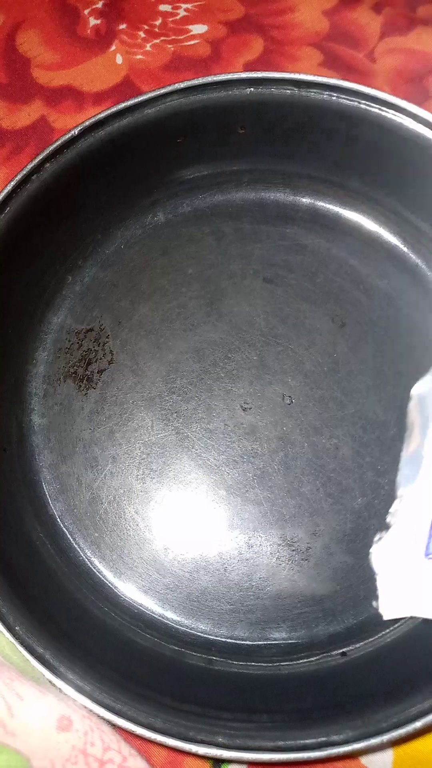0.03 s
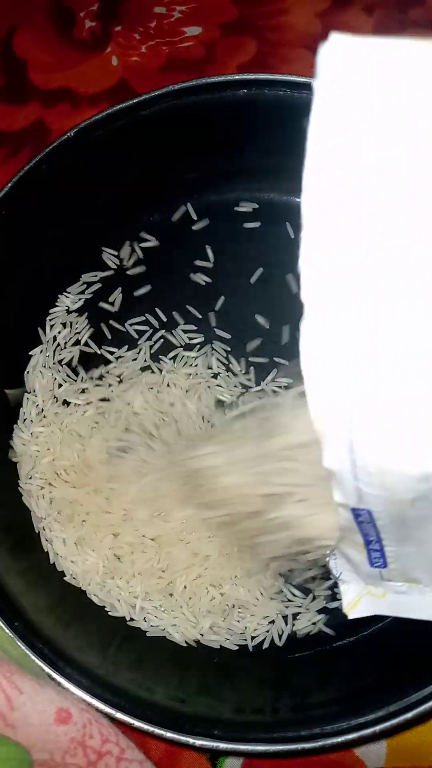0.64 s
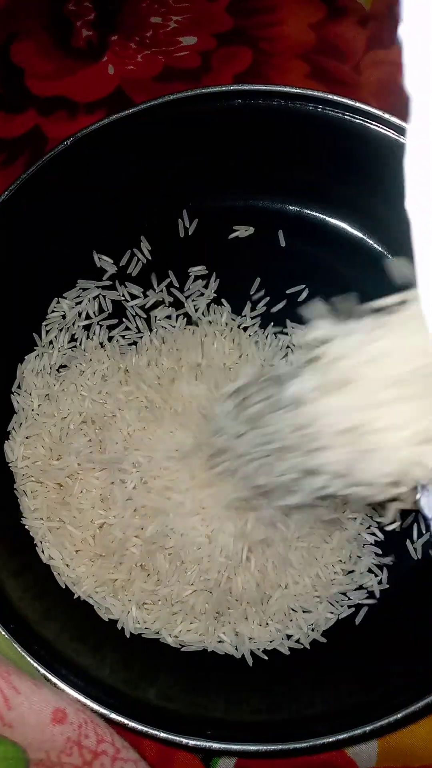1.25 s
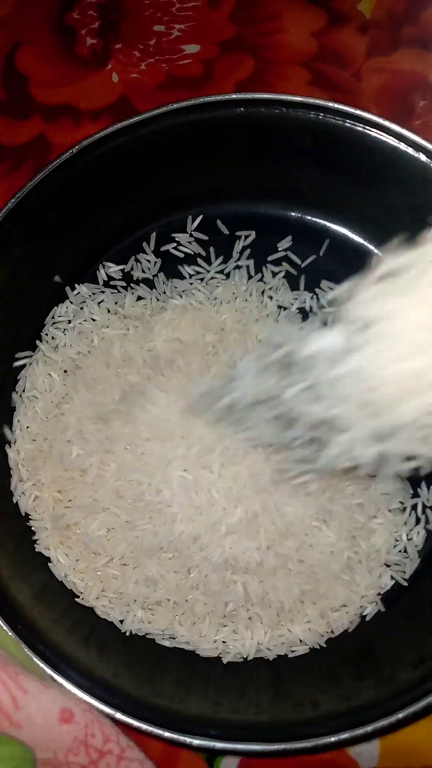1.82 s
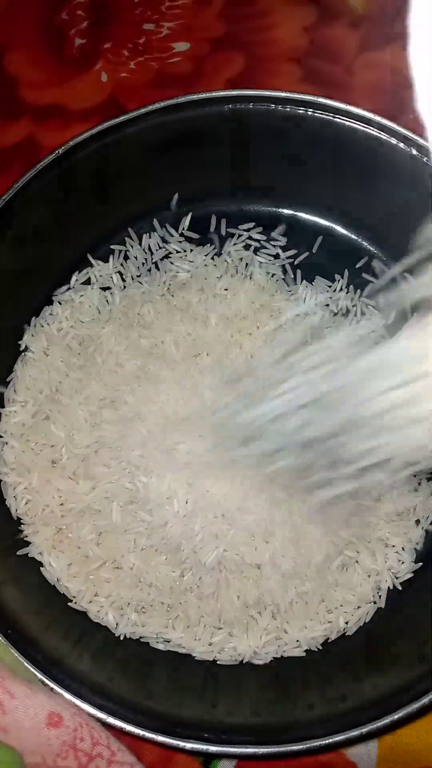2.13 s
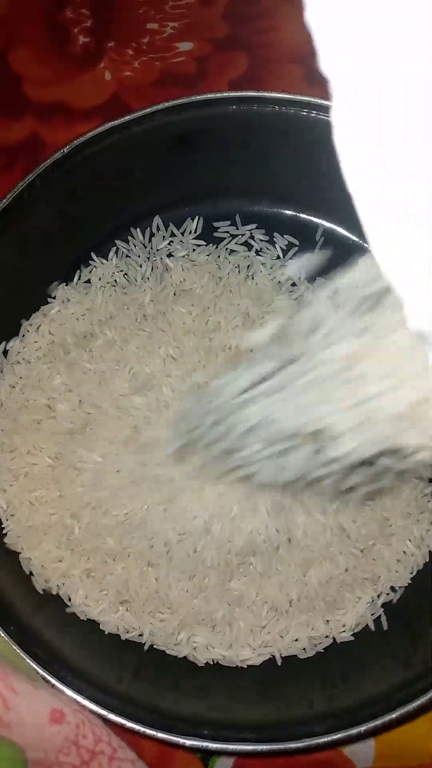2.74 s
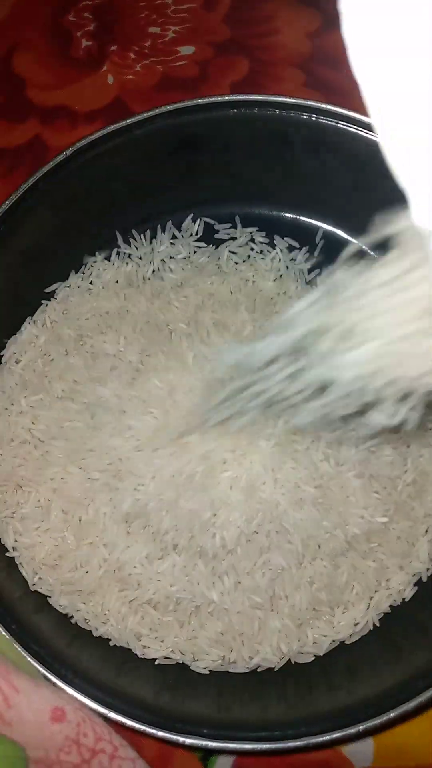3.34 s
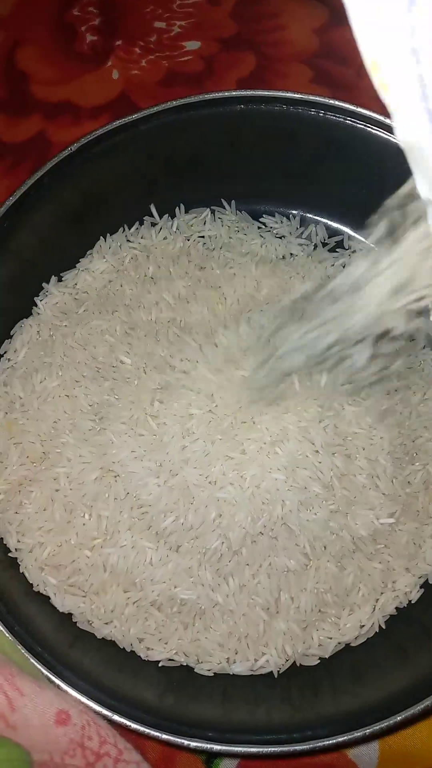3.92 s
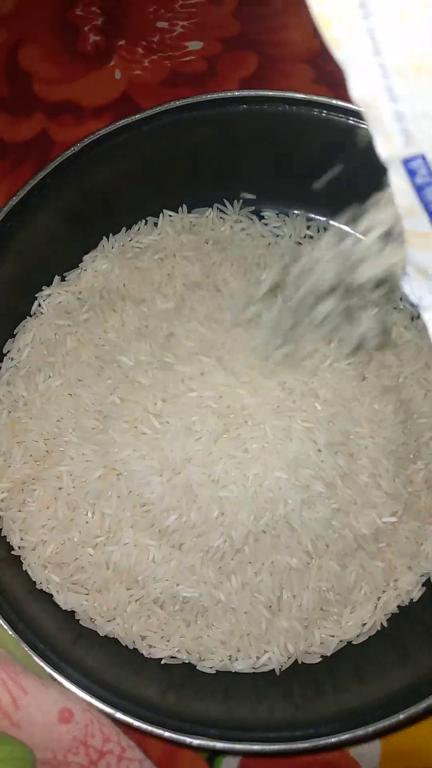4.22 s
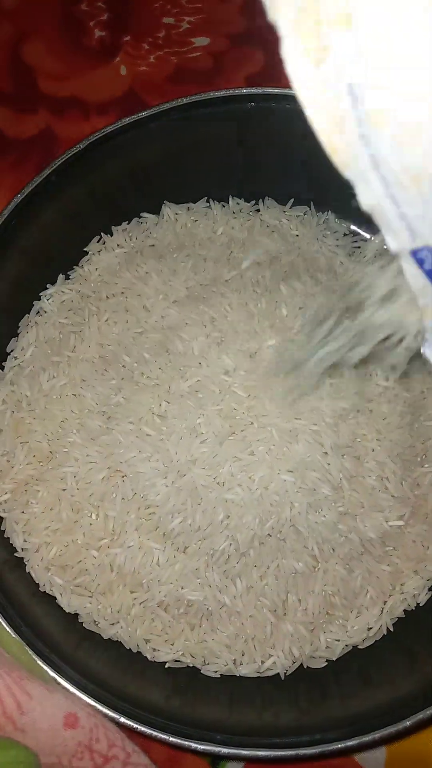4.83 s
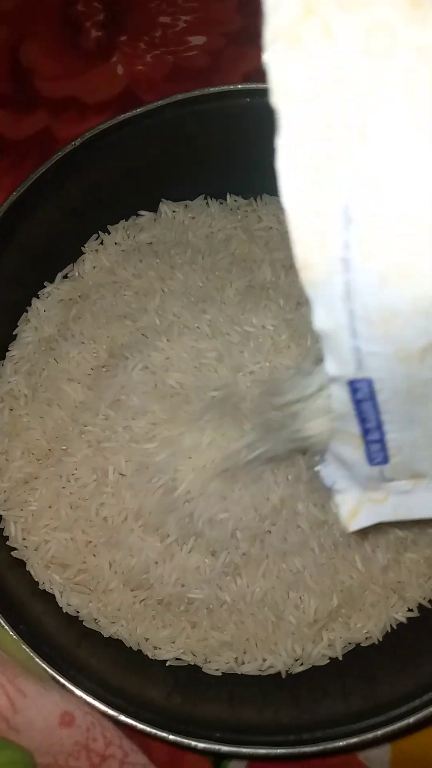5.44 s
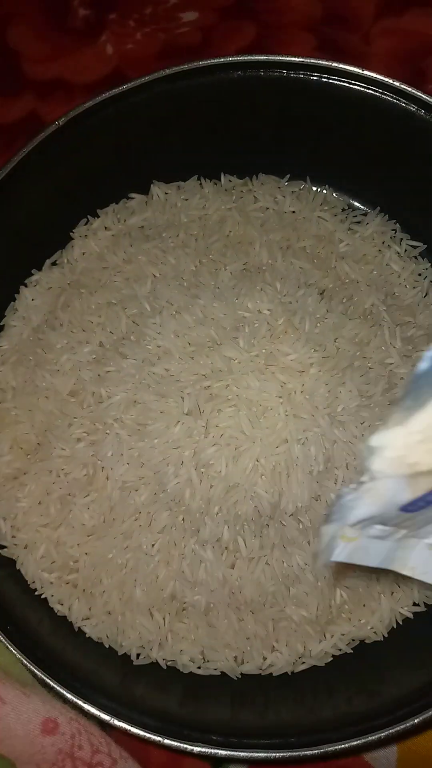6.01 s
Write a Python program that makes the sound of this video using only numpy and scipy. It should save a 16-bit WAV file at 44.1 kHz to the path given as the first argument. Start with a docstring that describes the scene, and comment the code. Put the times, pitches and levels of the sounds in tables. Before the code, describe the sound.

Close by, rice grains patter on bare metal, then hiss onto a growing heap while a plastic packet pops and crackles.

```python
"""Dry rice pours from a plastic packet into a metal pan, heard from close by.
The first grains ring the bare bottom; then the stream hisses on its own heap, grain jostling grain,
while the pan drums and stray grains strike its wall. The packet's film buckles and crinkles as it
empties, and crackles once more as it is tipped back. A low hum fills the small room."""
import sys
import numpy as np
from scipy import signal
from scipy.fft import rfft, irfft
from scipy.io import wavfile

SR = 44100
rng = np.random.default_rng(int(sys.argv[2]) if len(sys.argv) > 2 else 0)


def pcm_store(signal):
    """Save signal as 16-bit PCM."""
    levels = np.round(np.clip(np.atleast_2d(signal), -1, 1) * 32767)
    wavfile.write(sys.argv[1], SR, levels.astype(np.int16).T)


N = 272097
TIME = np.arange(N) / SR
LANDING_S, STOP_S = 0.3, 5.92   # the stream reaches the pan; the last grains leave the packet


def from_db(db):
    """Decibels to gain."""
    return 10 ** (np.asarray(db) / 20)


def rms_one(x):
    """Scale to rms 1."""
    return x / np.sqrt(np.mean(x ** 2) + 1e-20)


def since(s):
    """Seconds since a moment; 0 before it."""
    return np.maximum(TIME - s, 0)


def gain_curve(rows):
    """Rows of (s, dB) to a gain per sample."""
    s, db = np.transpose(rows)
    return from_db(np.interp(TIME, s, db))


def swells(rows, half_s):
    """Rows of (s, dB) to a gain with a smooth bump or dip at each moment."""
    return from_db(sum(db * np.exp(-((TIME - s) / half_s) ** 2) for s, db in rows))


def drift(rate_hz):
    """Slow random wander, rms 1."""
    r = np.exp(-2 * np.pi * rate_hz / SR)
    return rms_one(signal.lfilter([1], [1, -2 * r, r * r], rng.standard_normal(N + SR))[SR:])


def resonator(hz, width_hz):
    """Coefficients of a two-pole resonance, peak gain 1."""
    r = np.exp(-np.pi * width_hz / SR)
    return np.array([1, 0, -1]) * (1 - r * r) / 2, [1, -2 * r * np.cos(2 * np.pi * hz / SR), r * r]


def resonate(x, hz, width_hz):
    """Pass through one resonance."""
    return signal.lfilter(*resonator(hz, width_hz), x + 1e-18)


def ring_modes(x, modes):
    """Sum of parallel resonances."""
    return sum(from_db(db) * resonate(x, hz, width_hz) for hz, width_hz, db in modes)


def colour(x, points, size=4096):
    """Minimum-phase filter through (Hz, dB) points."""
    hz, db = np.transpose(points)
    bins = np.maximum(np.arange(size // 2 + 1) * SR / size, 1)
    cepstrum = irfft(np.log(from_db(np.interp(np.log(bins), np.log(hz), db))))
    cepstrum[1:size // 2] *= 2
    cepstrum[size // 2 + 1:] = 0
    return signal.fftconvolve(x, irfft(np.exp(rfft(cepstrum))))[:len(x)]


def burst(t60_s, size=2048):
    """Decaying noise burst, energy 1."""
    x = rng.standard_normal(size) * from_db(-60 * TIME[:size] / t60_s)
    return x / np.linalg.norm(x)


def impacts(per_s, spread_db):
    """Impulses of random time, size and sign, rms 1."""
    sizes = from_db(spread_db * np.minimum(rng.exponential(1, N), 3)) * rng.choice([-1, 1], N)
    return rms_one(sizes * (rng.random(N) < per_s / SR))


def add(out, s, sound, peak_db):
    """Mix in a sound at a given time and peak."""
    part = out[round(s * SR):][:len(sound)]
    part += from_db(peak_db) * sound[:len(part)] / np.max(np.abs(sound))


# Background spectrum. Each row: frequency in Hz, gain in dB.
ROOM_COLOUR = [(25, -34), (55, -4.5), (85, -1.5), (120, -6), (180, -1.5), (330, -2), (460, -28.5),
               (1500, -25), (8000, -37)]
# Each row: multiple of the hum's pitch, level in dB re the fundamental.
HUM_HARMONICS = [(1, 0), (2, -6.5), (3, -8), (4, -4.5)]
# Wavering of hum and background. Each row: time in seconds, gain in dB.
ROOM_SWELL = [(.08, -11), (.8, 2.5), (3.7, 4), (4.3, -2.5), (4.7, 3), (6.17, 3)]

def room_tone(hum_hz=83.3, width_hz=14.6, hum_db=-59, background_db=-61):
    """A wavering low hum over a dull background."""
    out = from_db(background_db) * rms_one(colour(rng.standard_normal(N), ROOM_COLOUR))
    for k, db in HUM_HARMONICS:
        line = resonate(rng.standard_normal(N), k * hum_hz, k * width_hz)
        out += from_db(hum_db + db) * rms_one(resonate(line, k * hum_hz, k * width_hz))
    return out * gain_curve(ROOM_SWELL)


# Strength of the stream. Each row: time in seconds, relative level in dB.
FLOW = [(0.09, -53), (0.13, -41), (0.25, -31.5), (0.9, -31.5), (1.38, -31.5), (1.54, -35.0), (1.8, -32.5),
        (2.6, -33.5), (3.0, -29), (3.45, -32.5), (3.57, -33), (3.75, -32.5), (4.25, -36.0), (5.05, -30.5),
        (5.33, -30.5), (5.55, -37.5), (5.7, -54.5), (6.17, -57.5)]
# Clumps dropping onto the heap. Each row: time in seconds, boost in dB.
CLUMPS = [(2.317, 0.5), (2.372, 3), (2.42, 6.5), (2.665, 0), (2.725, 1), (3.45, 4.5), (3.7, 1), (4.7, 3.5)]

def flow():
    """The flow follows the packet's tilt, with one brief dip and a few clumps."""
    dip = swells([(1.9, -4)], half_s=0.016)
    return gain_curve(FLOW) * dip * swells(CLUMPS, half_s=0.016)


def depth(shallow=0.23, grows_from_s=2.87, growth_per_s=0.57):
    """Rice depth under the moving grains, 0-1: first the full packet, then the growing heap."""
    heap = np.clip(shallow + growth_per_s * since(grows_from_s), 0, 1)
    return np.where(TIME < LANDING_S, 1, heap)


def rice_hiss(layers=8, trickle_share=0.02, gain_db=0.39, handover_s=0.062, emptied_s=5.55):
    """Grains jostle grains: in the packet, then on the heap, then in the packet as the stream thins."""
    strength = flow()
    per_s = 1000 * (trickle_share + (strength / strength.max()) ** 1.2)
    jostle = sum(signal.fftconvolve(impacts(per_s, spread_db=2.5), burst(t60_s=0.0051))[:N]
                 for _ in range(layers))
    flicker = from_db(1.08 * drift(60) + 0.5 * drift(16))
    jostle = jostle * flicker / np.sqrt(per_s)
    landed = np.minimum(since(LANDING_S) / handover_s, 1) - np.minimum(since(emptied_s) / handover_s, 1)
    return from_db(gain_db) * strength * (landed * on_heap(jostle) + (1 - landed) * in_packet(jostle))


# Air resonances of the open packet. Each row: frequency in Hz, width in Hz, gain in dB.
PACKET_MODES = [(1500, 460, 6.5), (2320, 200, 7), (2870, 560, 7.5), (3400, 180, 0), (3870, 360, 2.5),
                (4670, 270, 1), (5480, 160, -20), (6000, 210, -8)]
# Spectrum of rice sliding in the packet. Each row: frequency in Hz, gain in dB.
PACKET_COLOUR = [(150, -29), (450, -12), (660, -6), (900, 1), (1900, -3), (4000, -3), (5100, 1.5),
                 (6600, 10), (7900, -3), (9600, -11), (11600, -15), (16000, -20)]

def in_packet(jostle):
    """Sliding rice rings the air in the packet."""
    return rms_one(colour(jostle + ring_modes(jostle, PACKET_MODES), PACKET_COLOUR))


# Buckles of the packet wall. Each row: start in seconds, panel pitch in Hz, its peak in dB,
# overtone in Hz, its peak in dB, thump peak in dB, crack peak in dB.
POPS = [(0.169, 1140, -31, 1600, -36, -55, -39), (0.265, 1460, -25, 2880, -23, -31.5, -23),
        (0.8562, 1600, -20.5, 2180, -26, -43, -22), (1.003, 1000, -18.5, 1670, -21, -27, -13),
        (1.009, 1060, -23, 1590, -22, -31, -34), (1.1634, 1360, -16.5, 2130, -18, -28.5, -22),
        (1.248, 1090, -27, 1500, -33, -32, -35), (1.3326, 1160, -16.5, 1620, -13, -25.5, -18),
        (1.383, 1100, -21.5, 1690, -21, -20, -14.5), (1.5962, 1060, -12.5, 2260, -14.5, -25, -10.5),
        (1.8927, 1670, -24, 4120, -16, -26, -20), (1.912, 1450, -15, 2180, -18, -35.5, -14.5),
        (2.2534, 1350, -16, 2200, -21, -46, -12.5), (2.362, 1690, -28, 2500, -20, -54, -20),
        (2.410, 1190, -33, 2300, -27, -34, -18), (2.678, 1540, -20, 2300, -22, -38, -22),
        (2.874, 1140, -22, 1650, -29, -32, -35), (3.940, 1000, -32, 1800, -30, -53, -28),
        (5.050, 1230, -24.5, 2400, -24, -49, -26), (5.414, 1100, -35, 1650, -36, -35, -34.5),
        (5.538, 1050, -27, 1500, -42, -38, -39), (5.578, 1550, -27, 1990, -41, -44.5, -18),
        (5.607, 580, -29.5, 1190, -43.5, -37, -29), (5.807, 840, -26, 1560, -26.5, -40, -43),
        (5.838, 790, -33, 1470, -33, -45, -44), (5.9371, 840, -39, 1670, -38, -52, -10),
        (5.991, 1200, -39, 2300, -36, -55, -40), (6.001, 1000, -37, 1800, -35, -52, -41),
        (6.015, 1090, -32, 2000, -30, -43, -38)]
# Spectrum of a cracking crease. Each row: frequency in Hz, gain in dB.
CREASE_COLOUR = [(300, -13.5), (1500, -4.5), (3000, -15), (5000, -3.5), (6650, 2), (7500, -2), (9000, -13),
                 (12000, -23), (16000, -25)]

def packet_pops(panel_t60_s=0.01, overtone_t60_s=0.008, thump_t60_s=0.02, thump_centre_hz=351):
    """A film panel snaps through: two short rings, a thump of the filled packet, a crack at the crease."""
    out, t = np.zeros(N), TIME[:2048]
    for s, panel_hz, panel_db, overtone_hz, overtone_db, thump_db, crack_db in POPS:
        rings = (panel_hz, panel_t60_s, panel_db), (overtone_hz, overtone_t60_s, overtone_db)
        for hz, t60_s, peak_db in rings:
            snap = rms_one(np.sin(2 * np.pi * hz * t) * from_db(-60 * t / t60_s))
            flutter = rms_one(resonate(burst(t60_s), hz, hz * 0.8))
            add(out, s, resonate(snap + 0.69 * flutter, hz, hz * 1.2), peak_db)
        thump_hz = thump_centre_hz * (1 + 0.17 * rng.uniform(-0.81, 1))
        attack = 1 - np.exp(-t / 0.00033)   # inertia of the heavy packet
        thump = np.sin(2 * np.pi * thump_hz * t) * attack * from_db(-60 * t / thump_t60_s)
        add(out, s, resonate(thump, hz=240, width_hz=460), thump_db)
        add(out, s, colour(burst(t60_s=0.0063), CREASE_COLOUR), crack_db)
    return out


# Each row: start in seconds, peak in dB, lower band edge in Hz.
CRINKLES = [(0.197, -26, 3500), (0.2326, -17, 1500), (1.7908, -20, 4000), (1.833, -15, 3000),
            (1.9839, -15, 1520), (2.01, -18, 3000), (2.0916, -19, 4000), (2.16, -15, 2500),
            (2.2413, -18, 4000), (2.6598, -22, 1800), (2.748, -21, 3000), (3.4021, -16, 3500),
            (3.6385, -13.5, 3000), (3.686, -23, 2500), (3.7297, -16, 3000), (3.8197, -27, 2200),
            (4.0572, -21, 3520), (4.106, -18.5, 4000), (4.1265, -20, 3500), (4.1885, -20, 3000),
            (4.4589, -16, 2200), (4.5396, -15, 2000), (4.6198, -18, 1800), (4.942, -17, 2200)]

def packet_rustle(top_hz=7600, tip_back_s=5.94, run_db=-41, hold_s=0.061, fade_db_per_s=169.5):
    """Creases give way singly while pouring, and in a dense run as the packet is tipped back."""
    out = np.zeros(N)
    for s, peak_db, low_hz in CRINKLES:
        band = signal.butter(3, [low_hz, top_hz], "band", fs=SR, output="sos")
        add(out, s, signal.sosfilt(band, burst(t60_s=0.0053)), peak_db)
    creases = colour(impacts(per_s=3000, spread_db=-2.5), CREASE_COLOUR)
    run = (TIME > tip_back_s) * from_db(run_db - fade_db_per_s * since(tip_back_s + hold_s))
    return out + run * rms_one(creases)


# Each row: centre in seconds, level in dB, pitch in Hz, half length in seconds.
RUMBLES = [(0.275, -40.5, 180, 0.027), (1.008, -34.5, 327, 0.023), (1.397, -42.5, 267, 0.069),
           (4.895, -54, 184, 0.054), (5.124, -53.5, 494, 0.24), (5.447, -43, 175, 0.032),
           (5.953, -47, 240, 0.023)]

def rumbles():
    """Short dull low rumbles, and one longer faint low-mid swell near 5.1 s."""
    out = np.zeros(N)
    for s, db, hz, half_s in RUMBLES:
        rumble = resonate(resonate(rng.standard_normal(N), hz, hz * 0.83), hz, hz * 0.83)
        out += from_db(db) * np.exp(-((TIME - s) / half_s) ** 2) * rms_one(rumble)
    return out


# Metal modes of the pan's bottom and wall. Each row: frequency in Hz, width in Hz, gain in dB.
BOTTOM_MODES = [(2500, 260, -10), (3930, 55, -4), (4870, 55, -4), (5280, 160, -8), (5870, 50, 1),
                (6320, 160, -4), (6960, 55, 4), (7520, 70, -10), (7770, 80, -5), (8110, 60, -12),
                (8550, 90, -10), (8820, 60, -10), (9040, 45, -1), (9400, 100, -15), (9840, 70, -10),
                (10100, 70, -10), (10610, 80, -5), (11970, 170, -8), (12590, 60, -8), (13030, 130, -7),
                (13470, 80, -8), (14130, 60, -10), (14580, 70, -11), (14900, 140, -13), (15100, 130, -9),
                (15550, 130, -7)]
WALL_MODES = [(7010, 110, 6.5), (11140, 140, -12), (11700, 120, -3.5), (12900, 80, 1), (12600, 50, -13),
              (13000, 97, -3), (13240, 99, 1), (13900, 70, -7), (14450, 90, -26), (14650, 126, 2),
              (15600, 170, -15), (15350, 200, -7), (15900, 210, 7), (15800, 250, -20)]
# Single grains, first on the bottom, last on the wall. Each row: start in seconds, peak in dB.
FIRST_GRAINS = [(0.2835, -24), (0.2868, -22), (0.2945, -32), (0.3005, -36), (0.3115, -30), (0.3155, -20)]
LAST_GRAINS = [(5.653, -30.5), (5.6624, -27), (5.6694, -36), (5.743, -30), (5.7733, -33.5), (5.7843, -28),
               (5.8246, -29.5), (5.8405, -31), (5.8554, -36), (6.0422, -39)]

def lone_grains():
    """A lone grain skitters briefly on the metal and rings it."""
    out = np.zeros(N)
    for grains, modes in (FIRST_GRAINS, BOTTOM_MODES), (LAST_GRAINS, WALL_MODES):
        for s, peak_db in grains:
            skitter = burst(t60_s=0.027)
            contact = from_db(-5) * resonate(skitter, hz=8100, width_hz=7000)
            add(out, s, ring_modes(skitter, modes) + contact, peak_db)
    return out


# Air resonances of the pan. Each row: shallow frequency in Hz, deep frequency in Hz, width in Hz,
# shallow gain in dB, deep gain in dB.
PAN_AIR_MODES = [(1076, 1140, 213, -3, 3), (1410, 1450, 350, 2.5, 0.5), (1600, 1800, 164, 3.5, -8),
                 (2230, 2220, 370, 2.5, 3.5), (2850, 2910, 280, -2, 7.5), (3360, 3470, 190, 3.5, -2),
                 (3660, 3940, 360, 1.5, -11), (4450, 4360, 340, -4.5, -1), (4660, 4600, 300, -4, 1),
                 (5700, 5500, 680, -2.5, -7.5), (6320, 6170, 560, 2.5, 4.5)]
# Spectra of the shallow and the deep heap. Each row: frequency in Hz, gain in dB.
SHALLOW_COLOUR = [(150, -23.5), (450, -5.5), (660, -1.5), (820, 2), (1900, -4), (4000, -2), (5100, 1.5),
                  (6900, 2), (7900, -4), (9600, -2), (11600, -12.5), (16000, -40)]
DEEP_COLOUR = [(150, -34), (450, -19), (660, -8.5), (790, -1.2), (1900, -3.5), (4000, -0.6), (5100, 1.4),
               (6900, 2), (7900, -4.5), (9600, -4.5), (11600, -12.5), (16000, -21)]

def on_heap(jostle, wander_hz=2.44, wander_db=2.5, wander_share=0.013, block=1024):
    """The air in the pan rings; its modes glide as the heap grows and wander with the landing spot."""
    ringing, fill = jostle.copy(), depth()
    for shallow_hz, deep_hz, width_hz, shallow_db, deep_db in PAN_AIR_MODES:
        hz = (shallow_hz + fill * (deep_hz - shallow_hz)) * (1 + wander_share * drift(wander_hz))
        db = shallow_db + fill * (deep_db - shallow_db) + wander_db * drift(wander_hz)
        drive, state = jostle * from_db(db), np.zeros(2)
        for i in range(0, N, block):
            ring, state = signal.lfilter(*resonator(hz[i], width_hz), drive[i:i + block], zi=state)
            ringing[i:i + block] += ring
    shallow = rms_one(colour(ringing, SHALLOW_COLOUR))
    deep = rms_one(colour(ringing, DEEP_COLOUR))
    return (1 - fill) * shallow + fill * deep


def grains_on_metal(modes, per_s, contact_db, onset_db=-15, build_up_s=0.078):
    """A rain of grains builds up; each ticks and rings the modes by amounts set by where it lands."""
    hits = impacts(per_s, spread_db=4) * from_db(0.59 * drift(60))
    struck = np.flatnonzero(hits)
    rings = np.zeros(N)
    for hz, width_hz, db in modes:
        drive = np.zeros(N)
        drive[struck] = hits[struck] * rng.standard_normal(len(struck))
        rings += from_db(db) * resonate(drive, hz, width_hz)
    ticks = resonate(hits, hz=6600, width_hz=7000)
    pouring = (TIME > LANDING_S) * (TIME < STOP_S)
    build_up = from_db(onset_db * np.exp(-since(LANDING_S) / build_up_s))
    return pouring * build_up * (rms_one(rings) + from_db(contact_db) * rms_one(ticks))


def pan_bottom(gain_db=-22.5, damping_db_per_s=20, covered_s=0.847, closing_s=0.063, cover_db=8.5):
    """The bottom's ring is damped as rice spreads, then drops as the heap covers the landing spot."""
    loss_db = damping_db_per_s * since(LANDING_S) + cover_db * np.minimum(since(covered_s) / closing_s, 1)
    return from_db(gain_db - loss_db) * grains_on_metal(BOTTOM_MODES, per_s=6000, contact_db=-9)


# Stray grains on the wall. Each row: time in seconds, relative level in dB.
STRAYS = [(0.9, -32.5), (1.45, -30.5), (1.65, -32), (2.35, -33), (2.65, -27.5), (3.45, -32.5), (3.8, -35.5),
          (4.4, -43), (4.95, -44.5), (5.6, -38), (5.85, -43), (5.92, -50)]
# Sprays bouncing off the heap onto the wall. Each row: time in seconds, boost in dB.
SPRAYS = [(1.44, 5), (2.635, 0), (2.82, -1), (2.95, 3), (3.075, 4), (3.3, 7), (3.4, 6), (3.53, 6)]

def pan_wall(gain_db=-12.5):
    """Stray grains strike the wall, which still rings once the bottom is buried."""
    level = from_db(gain_db) * gain_curve(STRAYS) * swells(SPRAYS, half_s=0.013)
    return level * grains_on_metal(WALL_MODES, per_s=2200, contact_db=-0.5)


# Drumming as the packet is raised and lowered. Each row: time in seconds, gain in dB.
DRUMMING = [(0.3, 3), (0.85, -3), (1.2, 2), (2.9, 0.5), (3.6, -1.5), (4.2, -0.5), (4.7, 1), (5.5, -3)]

def pan_drumming(band_hz=(115, 410), gain_db=-21, cushion_db=4):
    """The whole pan drums on its cloth under the stream; the heap cushions it."""
    body = signal.butter(4, band_hz, "band", fs=SR, output="sos")
    thuds = rms_one(signal.sosfilt(body, impacts(per_s=700, spread_db=4.5)))
    return flow() * gain_curve(DRUMMING) * from_db(gain_db - cushion_db * depth()) * thuds


def scene():
    """Rice, pan and packet, with the faint tail and hum of a small room."""
    near = lone_grains() + rice_hiss() + pan_bottom() + pan_wall() + pan_drumming()
    near += packet_pops() + packet_rustle() + rumbles()
    tail = from_db(-20) * signal.fftconvolve(near, burst(t60_s=0.25, size=16384))[:N]
    return (near + tail + room_tone())[None]


# Microphone response: flat, with a bright resonance near 15 kHz. Each row: frequency in Hz, gain in dB.
MICROPHONE = [(25, -1), (70, 0.5), (13900, 0), (14500, 16), (15700, 12.5)]
OPEN_S, CUTOFF_HZ = 0.083, 15720

def record(dry):
    """The microphone opens after a moment; its port resonates; the top is cut."""
    heard = colour(dry[0] * (TIME > OPEN_S), MICROPHONE)[None]
    return signal.sosfilt(signal.ellip(12, .2, 70, CUTOFF_HZ, fs=SR, output="sos"), heard)


dry = scene()
out = record(dry)
pcm_store(out)
```